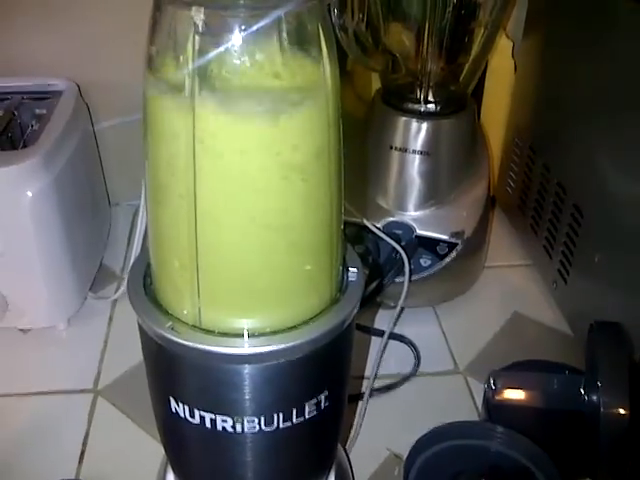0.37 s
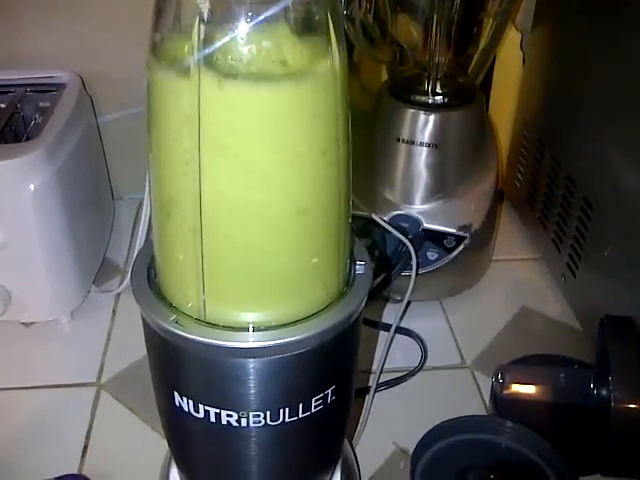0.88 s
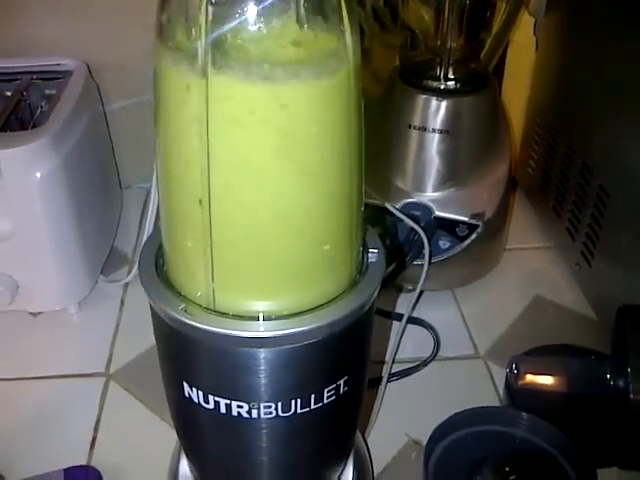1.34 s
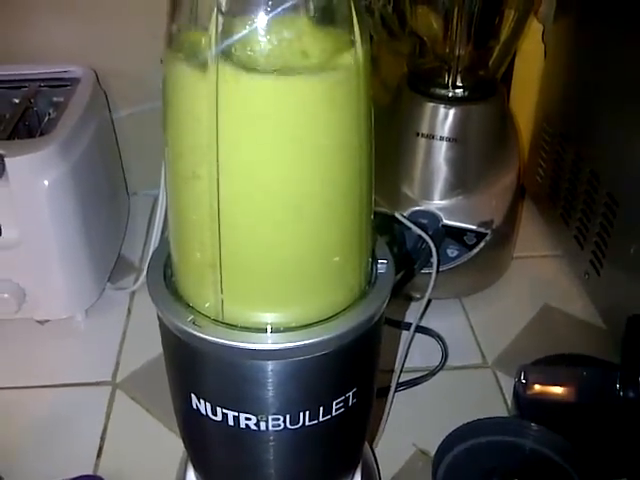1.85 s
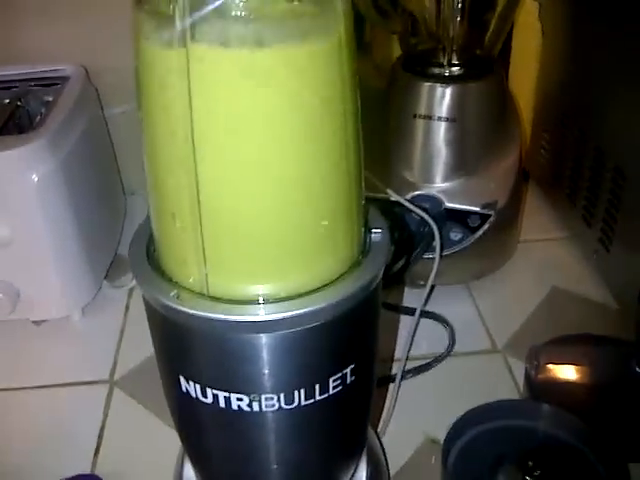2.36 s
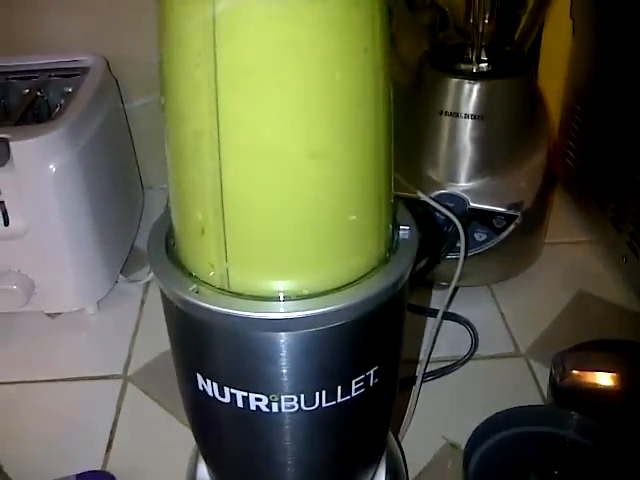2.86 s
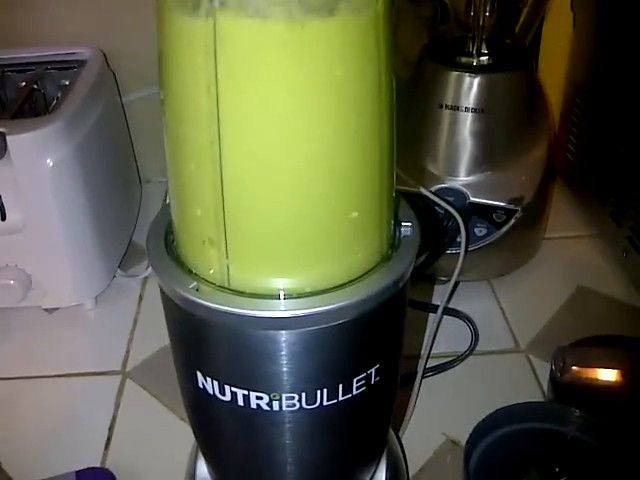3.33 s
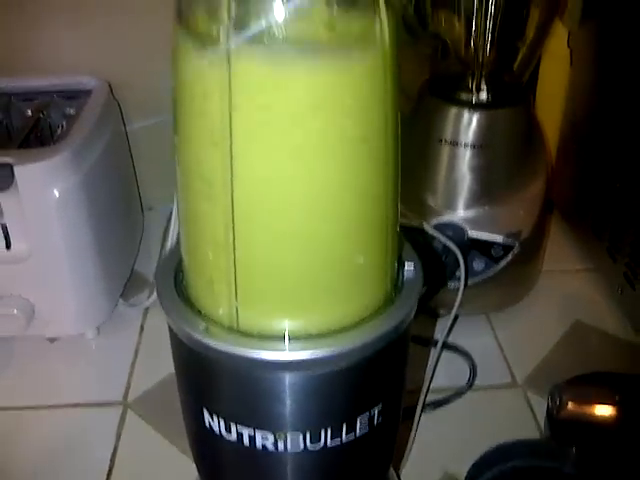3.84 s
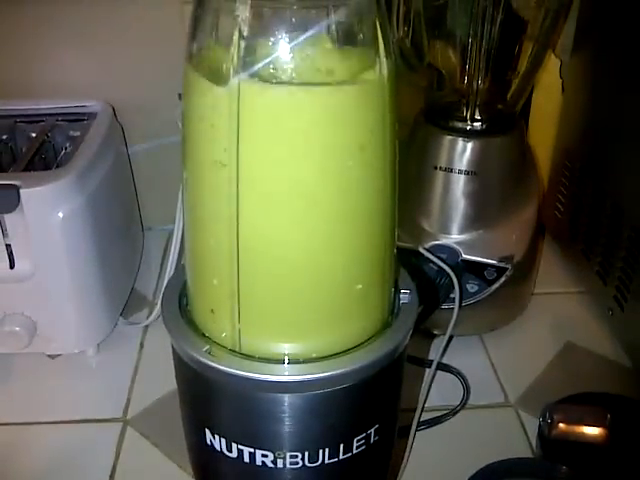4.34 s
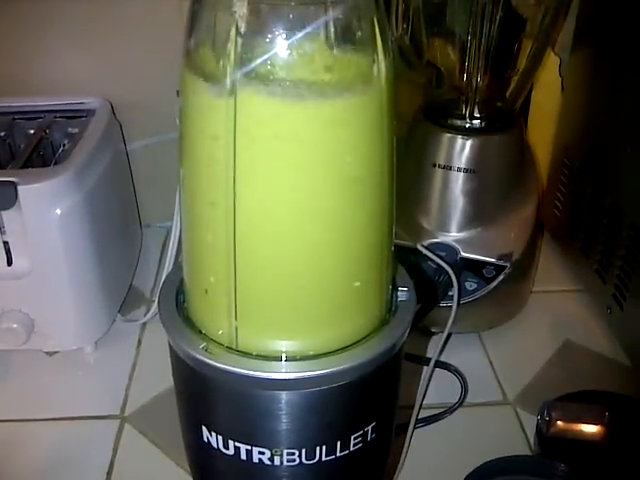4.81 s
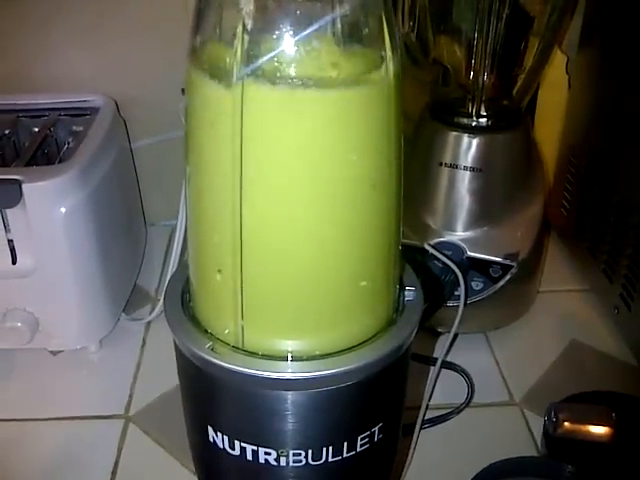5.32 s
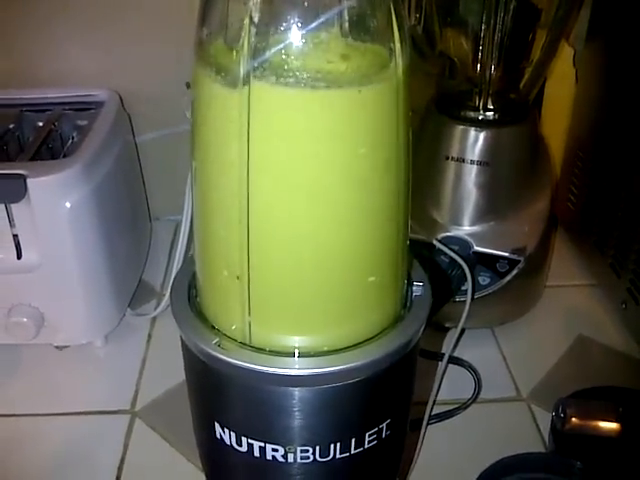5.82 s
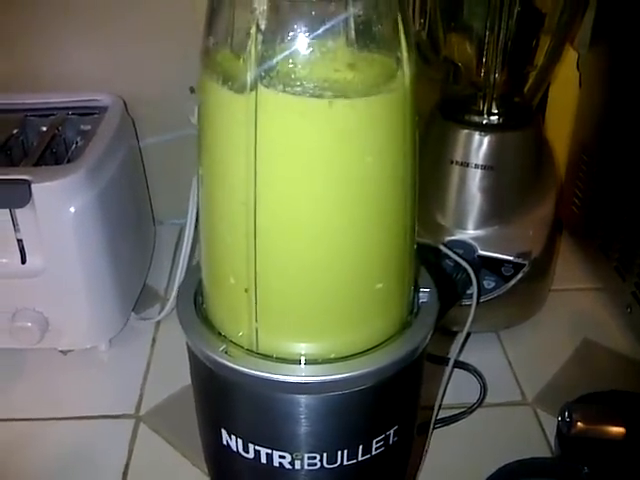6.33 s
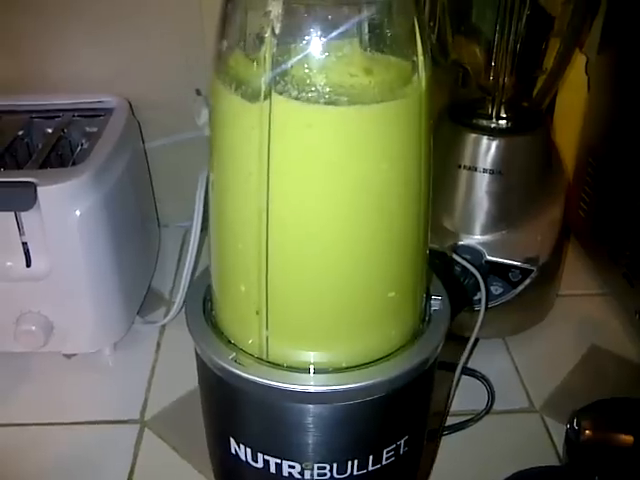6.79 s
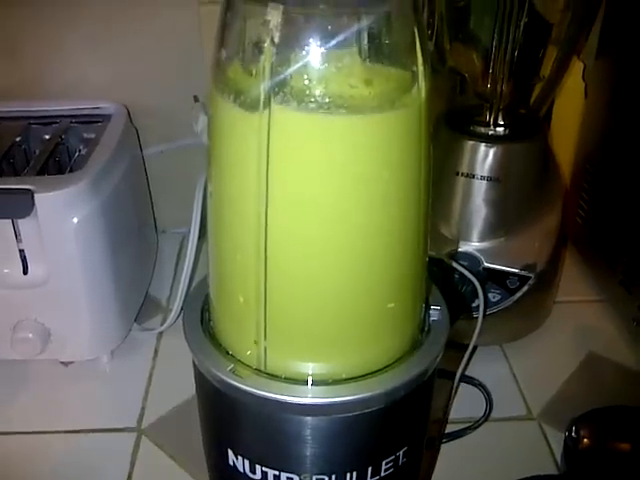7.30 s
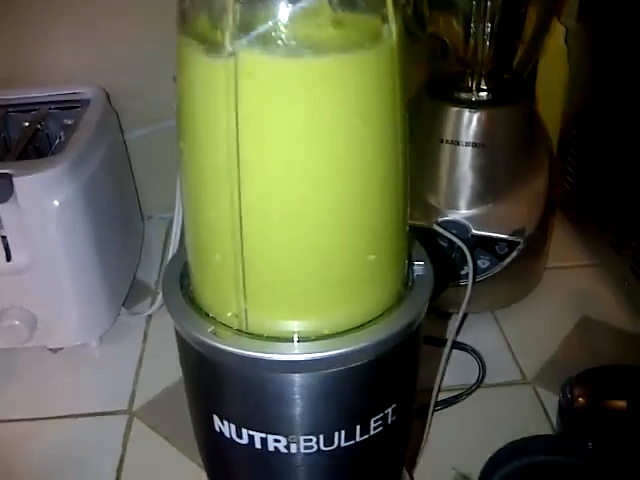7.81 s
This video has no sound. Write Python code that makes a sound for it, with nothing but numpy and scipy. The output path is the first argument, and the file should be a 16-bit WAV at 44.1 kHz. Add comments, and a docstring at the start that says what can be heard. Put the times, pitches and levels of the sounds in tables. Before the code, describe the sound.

Close, dry phone pickup of a blender at full speed on a tiled counter. Dense rasping motor noise around the upper mids carries a breathy, wavering whine; below sit churning cup resonances and faint low hum. Pitch and loudness throb rapidly in small waves, with brief hollow booms, becoming smoother after about five and a half seconds. The motor never stops.

```python
"""On a tiled counter, close to a phone, a small kitchen blender runs with its cup full of thick liquid.
The vortex surges about three times a second: the motor speeds up as the blades lose load, the roar swells just after.
Turbulence, as filtered noise, rings the cup, the liquid and the motor housing.
Sines locked to the shaft and a mains hum lie underneath, with noise for counter rumble and cooling air."""
import sys
import numpy as np
from scipy import signal
from scipy.fft import rfft, irfft, next_fast_len
from scipy.io import wavfile
from scipy.ndimage import uniform_filter1d

SR = 44100
rng = np.random.default_rng(int(sys.argv[2]) if len(sys.argv) > 2 else 0)


def makeup_ratio(level_db):
    """Linear amplitude ratio for a level in decibels (20 dB per factor of ten)."""
    decades = np.asarray(level_db, float) / 20
    return 10 ** decades


def bounce(signal):
    """Save signal as a 16-bit WAV file at the path given by the first command-line argument."""
    frames = np.transpose(np.atleast_2d(signal))
    limited = np.clip(frames, -1, 1)
    pcm = np.round(limited * 32767).astype(np.int16)
    wavfile.write(sys.argv[1], SR, pcm)


N = 349272
TIME_S = np.arange(N) / SR
FFT_SIZE = next_fast_len(N)
BIN_HZ = np.arange(FFT_SIZE // 2 + 1) * SR / FFT_SIZE


def unit_rms(x):
    """Scales to an rms of 1."""
    return x / np.sqrt(np.mean(x ** 2))


def walk(rate_hz):
    """Random levels held 1 / rate_hz seconds and slewed twice; spread near 0.7."""
    hold = int(SR / rate_hz)
    steps = np.repeat(rng.standard_normal(N // hold + 1), hold)
    slewed = uniform_filter1d(uniform_filter1d(steps, hold), hold)
    return 0.95 * slewed[:N]


def noise_spectrum():
    """Spectrum of fresh white noise."""
    return rfft(rng.standard_normal(FFT_SIZE))


def coloured(points):
    """Noise shaped by a spectrum of (Hz, dB) points, straight over log frequency, at unit rms."""
    hz, db = np.transpose(points)
    gain = makeup_ratio(np.interp(np.log(BIN_HZ + 1), np.log(hz), db))
    return unit_rms(irfft(noise_spectrum() * gain, FFT_SIZE)[:N])


def ring(modes, wander_db, rate_hz, steep):
    """Turbulence through each resonance, each wandering in strength on its own; sum at unit rms."""
    out = 0
    for hz, width_hz, db in modes:
        shape = (1 + (2 * (BIN_HZ - hz) / width_hz) ** 2) ** (-steep / 2)
        band = irfft(noise_spectrum() * shape, FFT_SIZE)[:N]
        out = out + makeup_ratio(db + wander_db * walk(rate_hz)) * band
    return unit_rms(out)


def swells(events, width_s):
    """Bell-shaped rises in dB."""
    return sum(db * np.exp(-((TIME_S - at_s) / width_s) ** 2 / 2) for at_s, db in events)


# Motor load: speed gains as the liquid thins; the surge dies, then half returns.
# Each row: time in seconds, mean shaft speed in turns/s, surge depth in turns/s.
MOTOR_LOAD = [(0, 171.3, 2.3), (1.5, 172.2, 2.1), (3.0, 173.0, 2.5), (5.2, 174.0, 2.2), (5.5, 173.9, .7),
              (5.9, 173.8, .25), (7.0, 174.0, .25), (7.3, 173.9, 1.0), (7.92, 173.9, .6)]
SURGE_HZ, FIRST_SURGE_S = 3.17, 0.265
STALL_S, LATE_SURGE_HZ = 5.5, 2.87  # the vortex re-forms slower
FLUTTER_TURNS_PER_S = 0.15


def vortex():
    """Blade load swings with the vortex: mean speed, surge depth and surge about the mean, all in turns/s."""
    s, mean, depth = np.transpose(MOTOR_LOAD)
    mean = np.interp(TIME_S, s, mean)
    depth = np.interp(TIME_S, s, depth)
    early_cycles = SURGE_HZ * (np.minimum(TIME_S, STALL_S) - FIRST_SURGE_S)
    late_cycles = LATE_SURGE_HZ * np.maximum(TIME_S - STALL_S, 0)
    swing = depth * np.cos(2 * np.pi * (early_cycles + late_cycles))
    return mean, depth, swing + FLUTTER_TURNS_PER_S * walk(14)


# Counter rumble spectrum. Each row: frequency in Hz, relative density in dB per Hz.
RUMBLE_SPECTRUM = [(15, -58.5), (25, -27.5), (113, -10), (162, -4), (211, -4), (264, -3.5), (290, -9.5),
                   (380, -22.5), (640, -120)]


def rumble():
    """Dull low noise through the counter, in quick lumps; unit rms in the band under the shaft tone."""
    low = coloured(RUMBLE_SPECTRUM) * makeup_ratio(1.8 * walk(12))
    under_shaft = signal.sosfilt(signal.butter(6, 140, fs=SR, output="sos"), low)
    return low / np.std(under_shaft)


MAINS_HZ, MAINS_RMS_DB = 239.95, -49


def mains_hum():
    """Steady-pitched mains sine, wandering in level."""
    return np.sqrt(2) * makeup_ratio(MAINS_RMS_DB + 2.0 * walk(4.8)) * np.sin(2 * np.pi * MAINS_HZ * TIME_S)


# Shaft orders. Each row: multiple of shaft speed, rms level in dB at zero surge depth,
# loss in dB per turn/s of surge depth.
SHAFT_ORDERS = [(4, -52, 0), (10, -58, 0), (12, -54, 1), (24, -55, 0), (35, -64, 3), (36, -57.5, 3)]
UNBALANCE_RMS_DB, UNBALANCE_DB_PER_TURN_PER_S = -45, -0.45  # at 173 turns/s; weaker when faster
UNBALANCE_WOBBLE_DB = 1.2


def shaft_tones(speed, depth, turn_rad):
    """Unbalance sine once a turn, plus faint multiples smeared by random phase and level."""
    unbalance_db = UNBALANCE_RMS_DB + UNBALANCE_DB_PER_TURN_PER_S * (speed - 173)
    out = makeup_ratio(unbalance_db + UNBALANCE_WOBBLE_DB * walk(9)) * np.sin(turn_rad)
    for multiple, db, lost_db in SHAFT_ORDERS:
        order_amp = makeup_ratio(db - lost_db * depth + 3.3 * walk(12))
        out = out + order_amp * np.sin(multiple * turn_rad + 1.0 * walk(9))
    return np.sqrt(2) * out


# Cooling air hiss spectrum. Each row: frequency in Hz, relative density in dB per Hz.
AIR_SPECTRUM = [(2650, -33), (4500, -6.5), (5050, -5), (5810, -9.5), (6330, -9), (6760, -10.5),
                (7140, -14.5), (8930, -47.5), (11600, -72.5), (19600, -120)]
# Narrow rings in the air. Each row: frequency in Hz, width in Hz, relative level in dB.
AIR_MODES = [(6380, 40, -27), (6880, 40, -22)]


def cooling_air():
    """Broad flow hiss, flickering in level, with weak narrow resonances."""
    hiss = coloured(AIR_SPECTRUM) * makeup_ratio(0.99 * walk(17))
    return hiss + makeup_ratio(-16.0) * ring(AIR_MODES, wander_db=0.5, rate_hz=0.93, steep=2.0)


# Cup resonances. Each row: frequency in Hz, width in Hz, relative level in dB.
CUP_MODES = [(328.2, 24, -0.5), (360, 19.5, -2.5), (393.8, 39, -4), (433.5, 5.9, -11.5), (469.6, 73, -9.5),
             (524, 62, -13), (600, 100, -14.5)]
# Brief booms of the cup. Each row: peak time in seconds, rise in dB.
CUP_BOOMS = [(.71, 5.5), (1.28, 3), (2.88, 3), (3.22, 4), (3.48, 2), (3.85, 2), (5.62, 2)]


def cup():
    """Turbulence rings the cup, which booms out briefly."""
    return ring(CUP_MODES, wander_db=2.1, rate_hz=9.9, steep=1.64) * makeup_ratio(swells(CUP_BOOMS, width_s=0.031))


# Liquid resonances. Each row: frequency in Hz, width in Hz, relative level in dB.
LIQUID_MODES = [(696, 58, -3.5), (745.6, 25, -2.5), (826, 77, -4), (909, 82, -5), (1020, 46, -5),
                (1094, 76, -6), (1173, 40, -7), (1287, 85, -7.5), (1360.5, 55, -3.5), (1451, 63, -6),
                (1546, 100, -11.5), (1727, 120, -10), (1934, 80, -13.5), (1970, 20, -9.5)]


def liquid():
    """Turbulence rings the body of liquid."""
    return ring(LIQUID_MODES, wander_db=1.8, rate_hz=3.0, steep=1.5)


def blade_beat(turn_rad):
    """Gain of the blade pair beating twice a turn."""
    return 1 + 0.15 * np.cos(2 * turn_rad)


# Whine resonances. Each row: frequency in Hz, width in Hz, relative level in dB.
WHINE_MODES = [(3127, 36, 0.28), (3190, 41, -1.3)]
# Flares of the whine. Each row: peak time in seconds, rise in dB.
WHINE_FLARES = [(2.7, 2.5), (3.65, 3), (4.35, 2.5), (5.7, 5), (7.2, 2.5)]


def whine(turn_rad):
    """Narrow-band noise beaten by the blades, flaring up at times."""
    tone = ring(WHINE_MODES, wander_db=1.0, rate_hz=7.0, steep=1.8)
    return tone * blade_beat(turn_rad) * makeup_ratio(swells(WHINE_FLARES, width_s=0.18))


# Motor housing resonances. Each row: frequency in Hz, width in Hz, relative level in dB.
HOUSING_MODES = [(2102, 110, -12.5), (2219, 40, -8.5), (2438, 178, -4.5), (2588, 58, -7), (2656, 76, -8.5),
                 (2780, 160, -2.5), (2988, 150, -4.5), (2790, 470, -13), (3255, 240, -8), (3410, 65, -6),
                 (3572, 190, -7), (3770, 90, -7.5), (3953, 200, -11), (4143, 85, -8.5), (4353, 310, -16.5),
                 (4620, 250, -22)]


def housing(turn_rad):
    """Turbulence rings the housing, beaten by the blades and chopped by lumps of liquid."""
    chop = makeup_ratio(0.5 * walk(10))  # lumps load the blades unevenly
    return ring(HOUSING_MODES, wander_db=1.1, rate_hz=2.5, steep=1.6) * blade_beat(turn_rad) * chop


# Phone shifts to a new place. Each row: time in seconds, then base levels in dB of rumble (under 140 Hz),
# cup, liquid, housing, whine, cooling air.
PHONE_PLACES = [(0, -59, -30, -29, -22, -32.5, -43), (2.25, -59, -30.2, -28, -22.5, -29, -40.7),
                (4.3, -59.5, -30, -29, -22.5, -32, -40.6), (6.6, -60, -30, -28.5, -22, -31, -39)]
# Swell in dB per turn/s of surge, one value each: rumble, cup, liquid, housing, whine, cooling air.
SURGE_SWELL_DB = [.3, 0.38, 0.25, 0.17, 0.25, 0.084]
SURGE_LAG_S, SHIFT_S = 0.065, 0.22


def scene():
    """The surge moves the shaft pitch, then swells every noise part after a lag."""
    mean, depth, surge = vortex()
    speed = mean + surge
    turn_rad = 2 * np.pi * np.cumsum(speed) / SR
    out = mains_hum() + shaft_tones(speed, depth, turn_rad)
    late_surge = np.interp(TIME_S - SURGE_LAG_S, TIME_S, surge)
    s, *place_db = np.transpose(PHONE_PLACES)
    moved = np.clip((TIME_S - s[1:, None]) / SHIFT_S + 0.5, 0, 1)  # 0 to 1 across each shift
    parts = rumble(), cup(), liquid(), housing(turn_rad), whine(turn_rad), cooling_air()
    for part, db, swell_db in zip(parts, place_db, SURGE_SWELL_DB):
        part_db = db[0] + np.diff(db) @ moved
        out = out + part * makeup_ratio(part_db + swell_db * late_surge)
    return out[None]


def roll_off(x):
    """The treble ends steeply here."""
    return signal.sosfilt(signal.butter(12, 9080, fs=SR, output="sos"), x)


def record(dry):
    """The phone rolls off the top steeply above 8250 Hz."""
    top = signal.butter(14, 8250, fs=SR, output="sos")
    mix = signal.sosfilt(top, dry)
    return roll_off(mix)


dry = scene()
out = record(dry)
bounce(out)
```